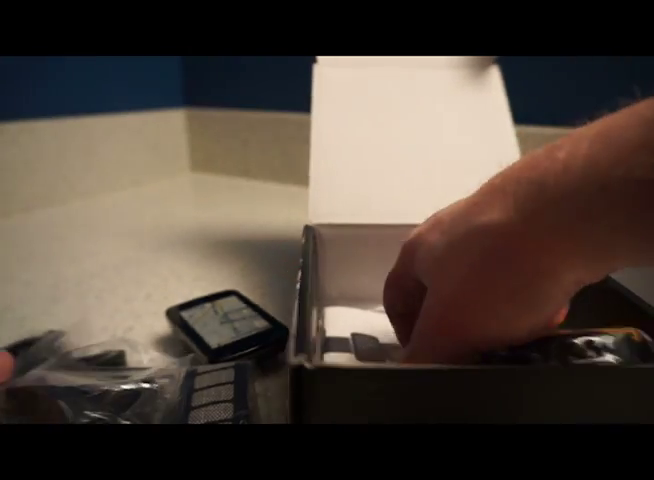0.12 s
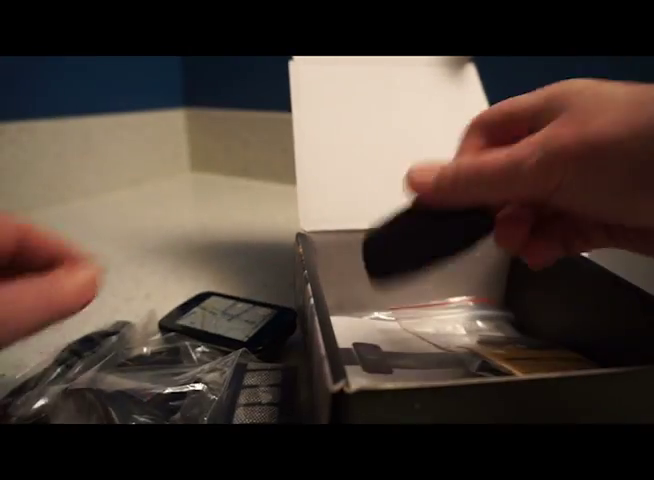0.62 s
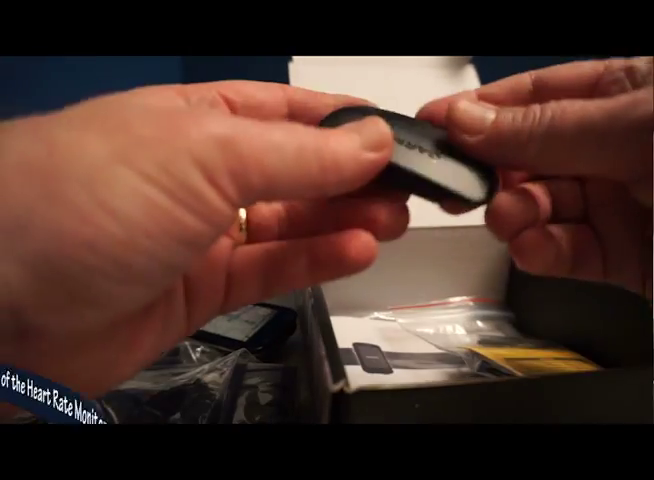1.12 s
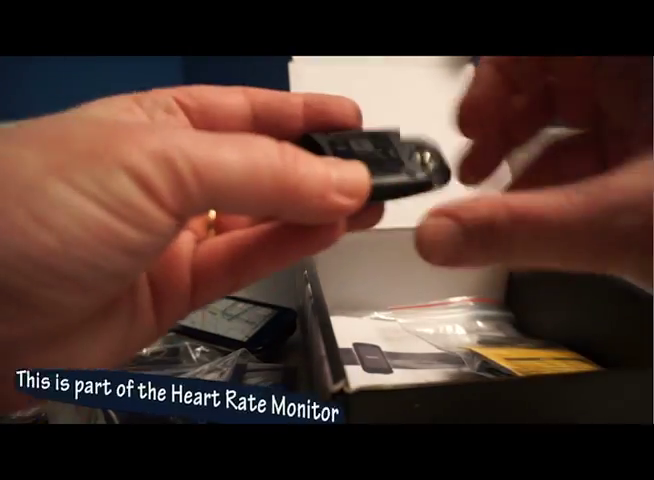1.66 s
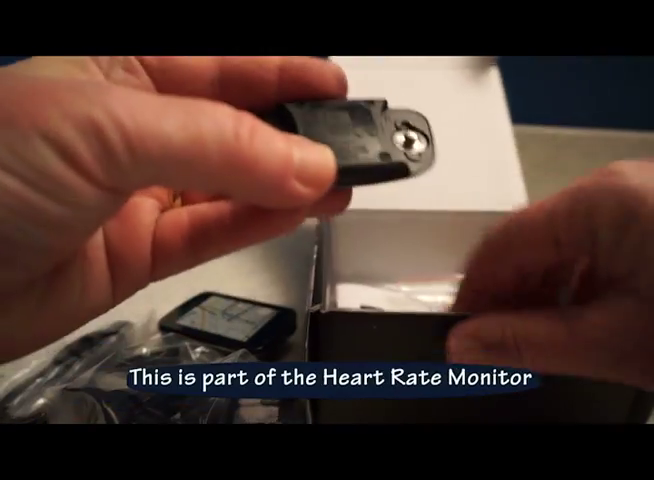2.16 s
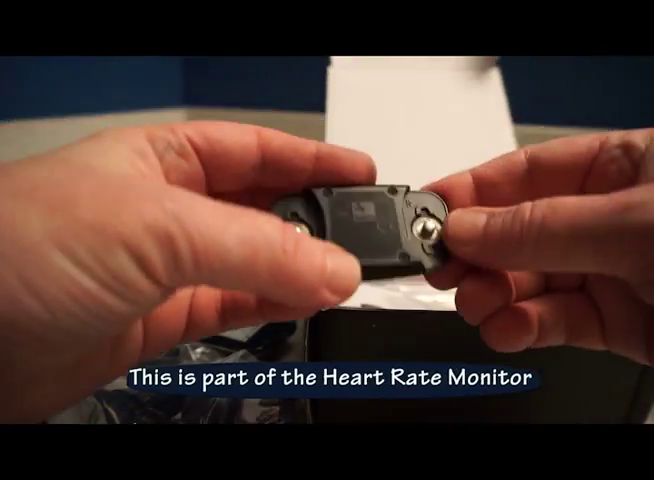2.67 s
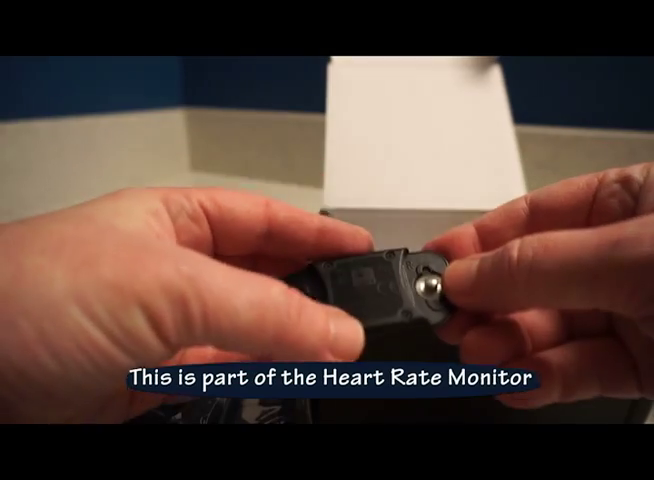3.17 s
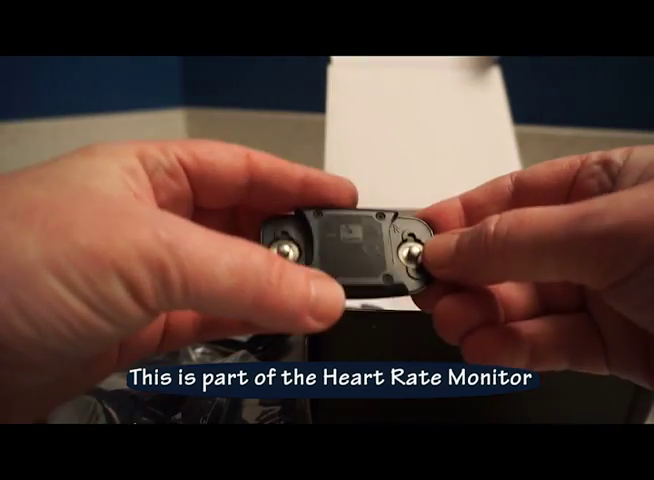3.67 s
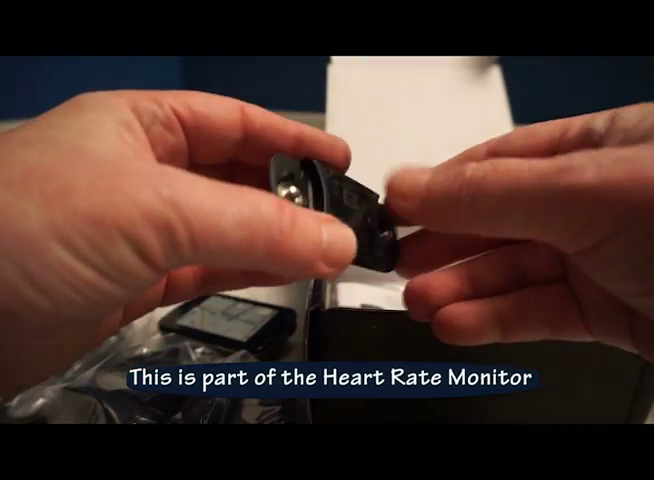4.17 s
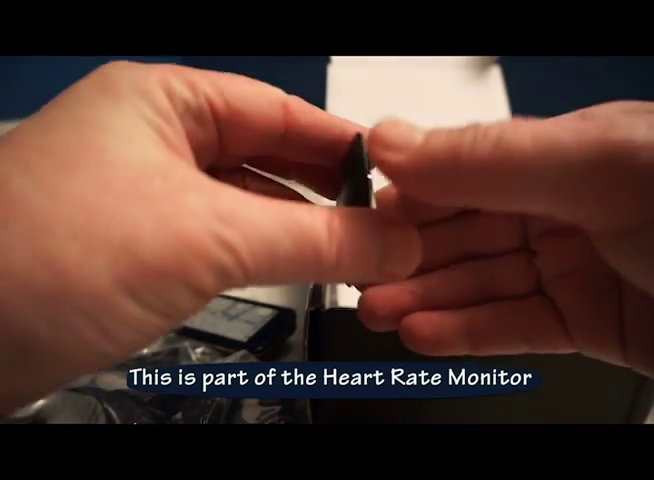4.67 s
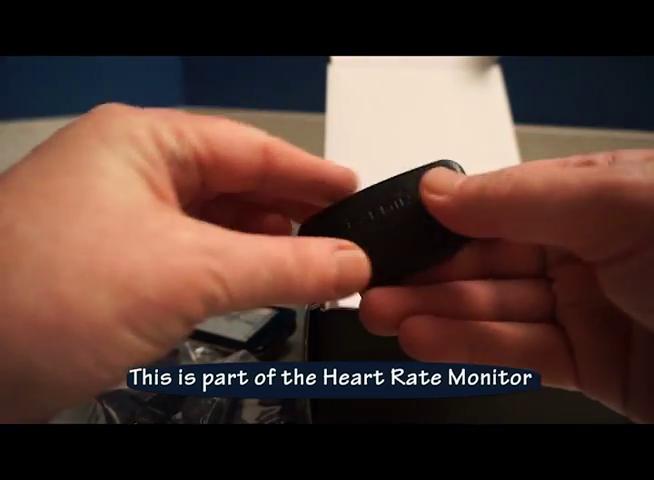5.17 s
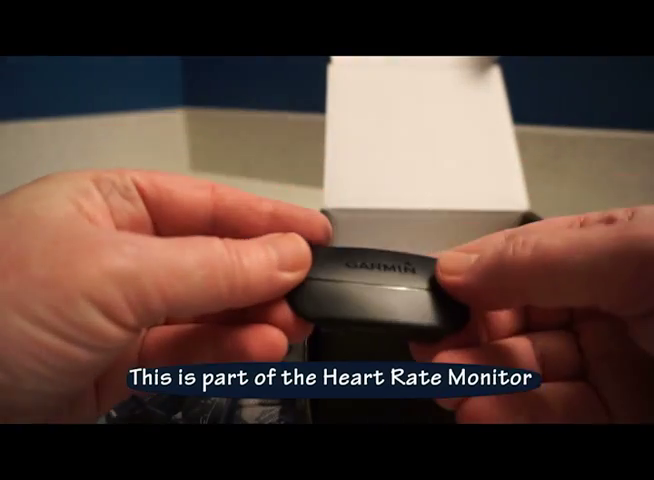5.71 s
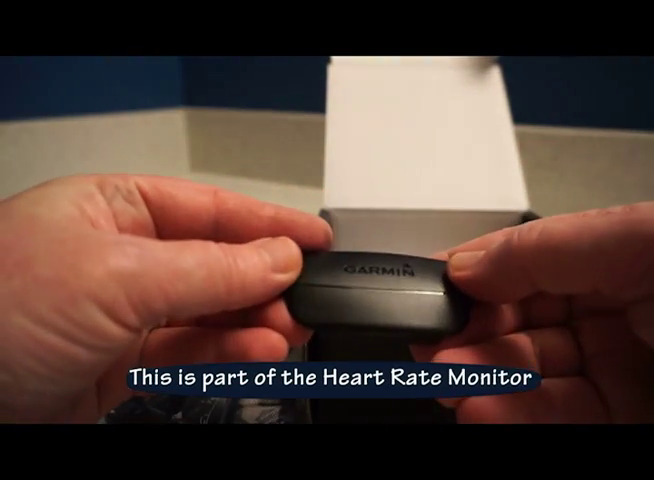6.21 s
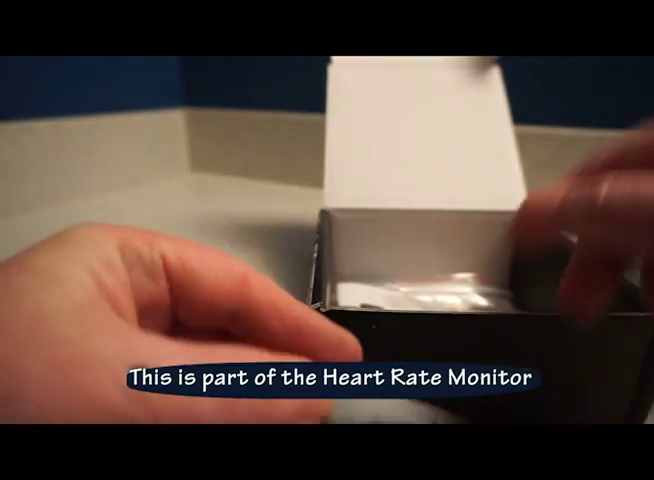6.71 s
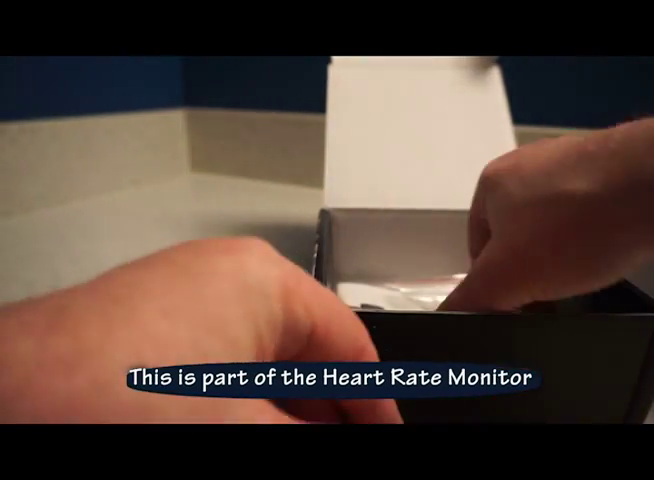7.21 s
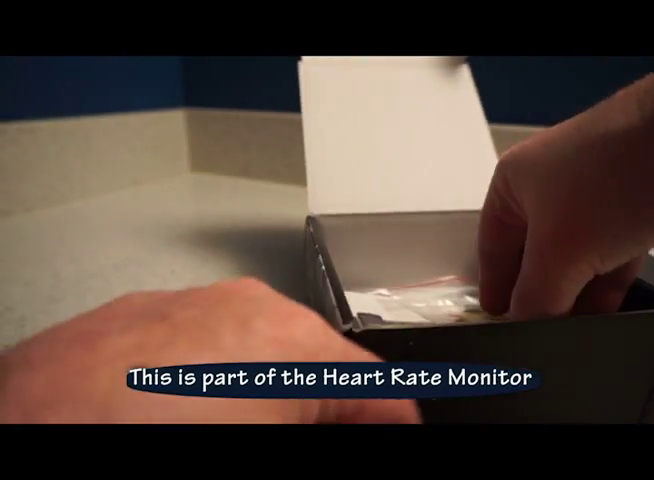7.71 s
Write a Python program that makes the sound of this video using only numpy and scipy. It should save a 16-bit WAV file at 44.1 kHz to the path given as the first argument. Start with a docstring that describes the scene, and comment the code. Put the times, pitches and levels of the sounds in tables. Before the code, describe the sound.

Close rustling and clicks from a card box, quiet skin rubs on plastic, a few box knocks, then a burst of loud crackling snaps over low rumble.

```python
"""Hands rummage in a small cardboard box, then skin rubs on a hard plastic part as it is lifted out.
Card scrapes, the box is nudged, fingers turn the part over, and the hands reach in again with loud snaps.
Noise strokes and short pushes ring card, film, plastic and skin, close to two ports in a small hard room.
Throughout lie a low rumble from outside with a drifting engine note, microphone hiss and faint electrical blips."""
import sys
import numpy as np
from scipy import signal
from scipy.io import wavfile
from scipy.ndimage import uniform_filter1d

SR = 44100
rng = np.random.default_rng(int(sys.argv[2]) if len(sys.argv) > 2 else 0)


def ratio_of_db(decibels):
    """Turn decibels (scalar or array-like) into linear amplitude factors; 0 dB maps to 1."""
    return 10 ** (np.asarray(decibels, float) / 20)


def store_pcm(level_fs):
    """Save levels as 16-bit WAV."""
    pcm = np.round(np.clip(level_fs, -1, 1) * 32767).astype(np.int16)
    wavfile.write(sys.argv[1], SR, np.atleast_2d(pcm).T)


N = 345744  # length in samples

# A place is a point on a line of bodies, numbered from the lowest; fractions fall between two bodies.
# Hand strokes in the box: peak_s, rise_s, fall_s, level_db, place (0 box, 1 card, 2 bag, 3 film)
RUMMAGE = [(0.002, .05, 0.11, -43, 2.6), (0.003, .05, 0.044, -45, 0), (0.08, 0.0091, 0.89, -36, 3.5),
           (0.2, 0.3, 0.26, -39.5, 2), (0.264, .006, 0.087, -34.5, 2), (0.313, .004, 0.12, -32, 1.5),
           (0.33, 0.09, 0.086, -27.5, 3), (0.328, 0.012, 0.03, -38, -1.5), (0.39, 0.11, 0.17, -37, 2.5),
           (0.45, 0.13, 0.12, -36.5, 1.5), (0.515, 0.011, 0.069, -23.5, -1), (0.52, 0.022, 0.21, -32, 2.5),
           (0.555, .02, 0.034, -32, 2.5), (0.572, .004, .05, -28.5, 3), (0.584, 0.018, 0.052, -23, 1.36),
           (0.61, .05, 0.076, -37, 0), (0.66, 0.055, 0.075, -43, -1.3), (0.705, .04, .06, -48, 3),
           (1.892, 0.0036, 0.15, -43, -0.5), (1.893, 0.0036, 0.083, -48.5, 2.5),
           (2.1, 0.21, 0.28, -40, 2.5), (2.17, 0.17, 0.16, -45, 3), (2.165, 0.055, .05, -47, 1),
           (2.2, 0.32, 0.19, -52.5, 0), (2.21, .15, .06, -47.5, 2), (6.68, 0.14, 0.51, -53.5, -6),
           (6.729, 0.089, 0.21, -58.5, 1.8), (6.802, 0.0023, 0.27, -51, 1.1),
           (6.846, 0.0044, 0.086, -45.5, 1.3), (6.927, .004, 0.28, -57.5, 2.2),
           (7.018, 0.0027, 0.087, -29.5, 1), (7.08, 0.072, 0.4, -46, 0.74), (7.246, 0.041, 0.084, -35, 0.6),
           (7.247, 0.066, 0.096, -41, 3), (7.33, 0.154, 0.2, -48.5, 2), (7.33, 0.045, 0.072, -49, 4),
           (7.36, 0.0034, 0.2, -42.5, 1.5), (7.39, 0.042, .08, -35.5, 1), (7.481, 0.031, 0.11, -34, .3),
           (7.535, 0.053, 0.083, -32, 2), (7.565, .1, 0.34, -33.5, 3), (7.591, .05, 0.084, -27, 2.5),
           (7.627, 0.055, .15, -26.5, 2.5), (7.677, 0.045, 0.099, -30.5, 1.5),
           (7.77, 0.0063, 0.21, -43, 2.3), (7.826, .07, .1, -39.5, 1.5)]
# Fingers on the hard part: peak_s, rise_s, fall_s, level_db, place (0 hollow, 1 lower shell, 2 upper shell, 3 rim)
FINGERS = [(1.002, .004, .08, -56.5, 1.6), (1.219, 0.062, .1, -58.5, 1.7), (1.34, 0.067, 0.055, -52.5, 3.5),
           (1.27, .1, 0.33, -63, 1.7), (1.39, .1, 0.17, -60, 5), (1.52, 0.14, 0.13, -61, 2),
           (1.44, 0.057, 0.1, -47, 2), (1.59, 0.033, .04, -59, 1), (1.679, 0.039, 0.088, -54, 2.5),
           (2.36, 0.025, .08, -60, .5), (2.361, 0.018, .04, -55, 3.5), (2.434, 0.019, 0.019, -41.5, 3),
           (4.458, 0.025, 0.074, -58, 1), (4.552, .03, 0.055, -54.5, 2), (4.699, 0.027, .04, -46.5, 2),
           (4.775, 0.038, 0.05, -54.5, 1.8), (4.845, 0.023, .03, -56, 1.8),
           (4.941, 0.028, 0.045, -49.5, 1.85), (5.03, 0.06, 0.11, -50.5, 1.7), (5.06, .15, 0.21, -49, 3.5),
           (5.09, 0.032, 0.071, -42.5, 0), (5.118, 0.055, 0.029, -36.5, 0.25), (5.33, 0.11, .08, -64, 2.5),
           (5.5, 0.53, 0.24, -66, 1.5)]
# Skin sliding without setting the part ringing: peak_s, rise_s, fall_s, level_db
SLIDES = [(1.002, .004, 0.11, -69), (1.19, 0.037, .2, -57.5), (1.32, .2, .3, -55),
          (1.439, 0.054, 0.09, -41), (1.56, .2, .3, -57.5), (1.678, 0.038, 0.1, -50.5),
          (2.36, .015, 0.07, -55), (2.44, .03, 0.092, -53.5), (4.171, 0.059, 0.065, -59.5),
          (5.09, 0.13, 0.15, -45), (5.128, 0.034, 0.023, -37.5), (5.24, 0.087, .2, -58.5),
          (5.41, 0.25, 0.24, -60), (5.523, 0.3, .19, -54.5), (5.921, .014, 0.024, -56)]
# Box walls and lid ringing in nudges, card crinkles and tails of snaps:
# peak_s, rise_s, fall_s, level_db, place (0 walls, 1 lid, 2 bag, 3 film)
BOX_RINGING = [(0.4, 0.017, 0.096, -39.5, 1.5), (0.46, 0.087, 0.017, -36, 1.5),
               (0.52, 0.016, 0.036, -31, -1), (2.58, 0.14, 0.57, -64.5, 1.5), (2.76, 0.29, 0.1, -69, 4),
               (2.978, 0.0065, 0.026, -39.5, 0), (3.035, 0.016, 0.091, -36, 0.2),
               (3.03, 0.023, 0.11, -42.5, 3), (3.031, 0.015, 0.25, -45.5, 1.5),
               (3.09, 0.065, .05, -41.5, 2.5), (3.095, 0.044, 0.038, -27.5, -0.08),
               (3.102, 0.044, 0.057, -35, 2.5), (3.162, 0.0044, 0.052, -31, -0.6),
               (3.163, .004, 0.065, -42, 2.5), (3.244, 0.0053, 0.024, -35, 0.15),
               (3.245, 0.0068, 0.053, -45, 2.5), (3.3, .05, 0.24, -63, 3.5), (3.452, .08, .13, -64, 1),
               (5.442, 0.036, 0.084, -56.5, 0.5), (6.134, .03, 0.12, -64, .1), (6.2, .06, 0.22, -59, 0.3),
               (6.29, .2, .03, -65, 0.5), (7.02, .004, 0.043, -42, 0.7), (7.484, 0.016, 0.044, -36, -1.5),
               (7.67, 0.024, 0.095, -34, 0)]
STROKE_DB = 20  # rise_s and fall_s are the times taken over this many dB
# Knocks and snaps: start_s, peak_db, place (0 box, 1 card, 2 bag, 3 film),
# focus_db (scale of the loss away from that place), pan_db (left over right)
SNAPS = [(0.0756, -24, 2.7, 9, 8), (0.1077, -15.5, 3, 10, 5), (0.118, -31, 1.5, 2.5, 6),
         (0.1807, -33, 1, 16, 4.8), (0.2438, -21, 2, 6.5, 1), (0.2603, -18.5, 3, 4.5, 3),
         (0.2873, -21, 2.5, 14, 1), (0.299, -30, 2.5, 19, -2), (0.312, -14, 2, 13, 3),
         (0.3309, -16.5, 0.94, 5.5, -0.5), (0.3457, -25, 1.5, 8, 2), (0.4539, -22, 1.4, 11.5, -1),
         (0.4965, -24, 1.6, 9, -2), (0.509, -29, .7, 1, -9), (0.5182, -12, 3.5, 3.5, 2),
         (0.57, -13, 1.5, 4, 0), (0.578, -20, 0.8, 2, 3), (0.584, -14, 1.6, 13, -3), (0.63, -25, 0, 10, -3),
         (1, -41.5, 3.5, 5, 3), (1.8892, -23, -1, 13, -2), (1.902, -26, -2, 3, 1),
         (2.3522, -29.5, 2.9, 7, 2), (2.9714, -25, 0, 32, -3), (3.023, -34.5, 4, 0, -9),
         (3.1592, -32.5, 2.5, 1.5, -2.2), (3.24, -28.5, 0.5, 6, -3), (3.442, -47.5, .6, 3, -2.9),
         (4.5532, -40.5, 1.5, 8, -4), (5.025, -26, 2, 16, 4.5), (5.121, -28, 1.9, 11, -8),
         (6.7218, -45.5, 1, 3, 3), (6.7996, -24.5, 0.9, 13, 2), (6.8433, -31.5, 1, 8, 0),
         (6.9248, -37.5, 1, 8, 3), (7.0139, -12, 1.5, 7.5, 1.5), (7.02, -31, 6, 10.5, 0),
         (7.223, -30, .5, 0, 1), (7.236, -23.5, 5, 0.5, -1), (7.2464, -20.5, 1.3, 2.5, -4),
         (7.3323, -33.5, 2, 0, 0), (7.3577, -21, 2, 7, 2), (7.4723, -18.5, 0.5, 20, -1),
         (7.4814, -16.5, -0.5, 14, 1), (7.4906, -19, 2.5, 9, -2.8), (7.5142, -7, 2.5, 6.5, -5.5),
         (7.53, -4.5, 2, 24, -5.5), (7.5348, -10.5, 2, 14, 4), (7.5632, -9.5, 2, 17, -8),
         (7.5786, -13, 3, 5.5, 0), (7.5861, -11.5, 2.5, 18, -17), (7.592, -20, 7, 4, 5),
         (7.6033, -10, 2.5, 11, -4), (7.6243, -7.5, 2, 30, -5.5), (7.6294, -18, 2.2, 12.5, 3),
         (7.6341, -12, 3, 4.5, 0), (7.6737, -12.5, 2.5, 6, -4), (7.766, -16.5, 2, 21, -0.5),
         (7.793, -31, 0.5, 11, -4.5), (7.834, -23, 0.6, 8, 0)]
SNAP_DOWN, SNAP_LEVELLING = 1.93, 0.43  # lower bodies lose more; the loss levels off with distance

# Resonances of each body: pitch_hz, half_width_hz (at -6 dB), relative level_db
BOX = [(161, 100, -11.5), (287, 160, -6), (503, 81, -8), (657, 88, 1), (820, 238, -3.5), (1005, 233, -7.5),
       (1192, 81, -8)]
CARD = [(1580, 430, 2), (2134, 370, -2.1), (2556, 460, -0.5)]
BAG = [(3330, 1080, 0), (4990, 750, 0), (5800, 920, -2), (8180, 1320, -4.5)]
FILM = [(9400, 2540, 3.4), (12260, 3200, 2.1), (14900, 1700, 3.5)]
HOLLOW = [(1590, 110, -3), (2000, 260, -1), (2450, 220, -1)]
SHELL = [(3450, 160, 0), (3850, 220, -3), (4700, 260, -4), (5100, 240, 0)]
RIM = [(7970, 260, -6), (8330, 270, -5.5)]
SKIN = [(3970, 2700, -6.5), (7150, 3000, -1.5), (10300, 2100, 5), (13100, 4600, 0), (14600, 1000, -19)]
WALLS = [(260, 135, -9), (667, 62, 0.5), (767, 70, -6), (1256, 55, -7)]
LID = [(1645, 290, -1.5), (1993, 160, 2), (2650, 620, -5.5)]

# How readily strokes crackle: bag level_db, share of crackle (0 to 1)
CRACKLE = [(-47, 0), (-41, .4), (-30, .25)]
GRAINS_PER_S, GRAIN_SPREAD_DB = 500, 5
# Left-right likeness of close sounds, from the lowest body to the highest (0 to 1)
PORTS_SAME = [0.99, 0.6, 0.58, 0.073]
# Where the hands are: time_s, pan_db (left over right)
HANDS = [(0.0, 3), (0.08, 2.5), (0.41, -0.5), (4.39, -0.5), (4.48, 5), (5.46, -2.5), (7.16, 0.5),
         (7.21, -0.5), (7.42, 0), (7.47, -2), (7.77, 0.5), (7.84, -2.5)]
# Dying away of the small hard room: pitch_hz, t60_s
ROOM = [(300, 0.097), (800, 0.43), (2000, 0.3), (5500, 0.13), (14000, 0.069)]

# Room modes lit by the rumble: pitch_hz, width_hz (full, at -6 dB), relative level_db
ROOM_MODES = [(35, 34, -18.5), (59.2, 19, -4.5), (71.5, 8.6, -6), (101, 19, -15), (117.9, 6.5, -1),
              (147.5, 19, -2.5), (224, 97, -13.5), (262.6, 33.5, -5), (320.3, 46, 0), (349.6, 8.8, -6),
              (384, 13.2, -4.5), (425.2, 6.1, -5), (483, 52, -22.5), (674, 41, -21)]
# Swell of the rumble: time_s, level_db
RUMBLE = [(0.0, -51), (0.37, -60), (0.56, -42), (0.81, -56), (1.92, -51.5), (2.49, -51), (2.95, -57),
          (3.19, -53), (4.8, -48.5), (5.26, -46), (5.61, -51), (6.53, -46), (7.03, -48.5), (7.27, -45),
          (7.71, -49.5)]
# Left-right likeness of the rumble: pitch_hz, likeness (-1 to 1)
RUMBLE_SAME = [(30, .998), (70, 1), (130, 0.98), (290, 0.92), (700, 0.66)]
# A far engine: time_s, pitch_hz, level_db
DRONE = [(0, 75, -73), (1.2, 76, -59), (2.3, 76.5, -61), (2.6, 72.2, -58), (5.9, 68, -85), (6.2, 71.6, -51),
         (6.5, 71.6, -48.5), (6.9, 77.4, -85), (7.1, 75, -81)]
# Colour of the microphone hiss: pitch_hz, relative level_db
HISS = [(18, -39), (30, -9), (69, -5), (193, -20), (318, -24.5), (553, -22.5), (700, -22), (1800, -29.5),
        (11600, -36), (12600, -35), (15900, -39)]
HISS_LEVEL_DB = -57
# Left-right likeness of the hiss: pitch_hz, likeness (-1 to 1)
HISS_SAME = [(300, 0.85), (640, -0.58), (1410, -0.33), (3100, -0.31), (6820, -0.28), (15000, 0.26)]
# Electrical tones: pitch_hz, peak level_db
BLIPS = [(12920, -63), (9800, -71)]
BLIP_START_S, BLIP_LENGTH_S, BLIPS_PER_S = 0.033, 0.008, 23.976


def evened(x):
    """Scales to rms 1."""
    return x / np.sqrt(np.mean(x ** 2) + 1e-20)


def read(points, hz):
    """Reads a curve on a log-frequency axis."""
    f, value = np.transpose(points)
    return np.interp(np.log(hz + 1), np.log(f + 1), value)


def ring(modes, size=2048):
    """Impulse response of a body: each mode swells and dies, so its skirts are steep."""
    t = np.arange(size) / SR
    response = np.zeros(size)
    for k, (hz, width, db) in enumerate(modes):
        swell = width ** 2 * t * np.exp(-2 * np.pi * width * t)
        response += (-1) ** k * ratio_of_db(db) * swell * np.sin(2 * np.pi * hz * t)
    return response


def ported(noise, same):
    """Mixes two unrelated noises into a left and right of given likeness."""
    return np.array([noise[0], same * noise[0] + np.sqrt(1 - same ** 2) * noise[1]])


def loss_db(place, count, below_db, above_db, levelling):
    """Bodies away from the place of contact get less; the loss levels off with distance."""
    away = np.arange(count) - np.asarray(place)[..., None]
    return np.where(away < 0, below_db, above_db) * away ** 2 / (1 + levelling * away ** 2)


def strokes(table, count, below_db, above_db, levelling, damping):
    """Level in dB of every body over time: strokes swell and fade, higher bodies fade sooner if damping > 1."""
    t = np.arange(0, N + 32, 32) / SR
    peak_s, rise_s, fall_s, level_db, place = np.transpose(table)
    lost = loss_db(place, count, below_db, above_db, levelling)
    late = t - peak_s[:, None]
    before = np.maximum(-late, 0) / rise_s[:, None]
    after = np.maximum(late, 0) / fall_s[:, None]
    levels = []
    for k in range(count):
        peak_db = (level_db - lost[:, k])[:, None]
        each_db = peak_db - STROKE_DB * (before + after * damping ** k)
        power = ratio_of_db(2 * each_db).sum(0)
        levels.append(np.interp(np.arange(N) / SR, t, 10 * np.log10(power + 1e-12)))
    return levels


def rubbing(levels_db, bodies, drive):
    """A noisy stroke passes each body at its own strength, panned to where the hands are."""
    sames = np.interp(np.linspace(0, 3, len(bodies)), range(4), PORTS_SAME)
    sound = np.zeros((2, N))
    for db, body, same in zip(levels_db, bodies, sames):
        stroke = drive * ported(rng.standard_normal((2, N)), same)
        rung = signal.oaconvolve(stroke, ring(body)[None], axes=1)[:, :N]
        sound += ratio_of_db(db) * evened(rung)
    pan_db = np.interp(np.arange(N) / SR, *np.transpose(HANDS))
    return sound * ratio_of_db(np.outer([.5, -.5], pan_db))


def patchy(sound, patchy_db, size, frames):
    """Random patches of colour: the tone of the rubbing varies from moment to moment."""
    z = signal.stft(sound, SR, nperseg=size, noverlap=size * 3 // 4)[2]
    patches = rng.standard_normal(z.shape[:0:-1]).T  # both channels share the patches
    patches = uniform_filter1d(patches, size=5, axis=0)
    patches = evened(uniform_filter1d(patches, size=frames, axis=1))
    return signal.istft(z * ratio_of_db(patchy_db * patches), nperseg=size, noverlap=size * 3 // 4)[1][:, :N]


def rummage(patchy_db=2.0):
    """Light strokes hiss smoothly; firm ones break into crackle."""
    levels_db = strokes(RUMMAGE, count=4, below_db=9.5, above_db=9, levelling=0.44, damping=1.145)
    crackle = np.interp(levels_db[2], *np.transpose(CRACKLE))
    grain_peaks = ratio_of_db(GRAIN_SPREAD_DB * np.minimum(rng.exponential(1, N), 3))
    grains = grain_peaks * (rng.random(N) < GRAINS_PER_S / SR)
    grains = signal.lfilter([1], [1, -.93], grains)  # each grain decays with a time constant under a millisecond
    drive = np.sqrt(1 - crackle + crackle * evened(grains) ** 2)
    sound = rubbing(levels_db, (BOX, CARD, BAG, FILM), drive)
    return patchy(sound, patchy_db, size=128, frames=10)


def fingers(flutter_db=1.5, skin_db=-6):
    """Skin slides over the part and sets the piece under it singing in narrow bands."""
    part_db = strokes(FINGERS, count=4, below_db=13, above_db=20, levelling=.55, damping=1.02)
    slide_rows = [(*row, 0) for row in SLIDES]  # a single body, so every place is 0
    slide_db, = strokes(slide_rows, count=1, below_db=0, above_db=0, levelling=0, damping=1)
    # skin is heard in every slide, and also skin_db against the strongest piece of the part
    skin = np.hypot(ratio_of_db(slide_db), ratio_of_db(np.max(part_db, axis=0) + skin_db))
    flutter = ratio_of_db(flutter_db * evened(uniform_filter1d(rng.standard_normal(N), size=600)))
    bodies = (HOLLOW, SHELL[:2], SHELL[2:], RIM, SKIN)
    sound = rubbing([*part_db, 20 * np.log10(skin)], bodies, flutter)
    return patchy(sound, patchy_db=2, size=256, frames=16)


def box_ringing(judder_db=1.5):
    """Box walls and lid ringing in narrow bands: nudges, card crinkles and tails of snaps, with a random judder."""
    levels_db = strokes(BOX_RINGING, count=4, below_db=5.5, above_db=23.5, levelling=0.62, damping=1.02)
    judder = ratio_of_db(judder_db * evened(uniform_filter1d(rng.standard_normal(N), size=200)))
    sound = rubbing(levels_db, (WALLS, LID, BAG, FILM), judder)
    return patchy(sound, patchy_db=2.5, size=256, frames=12)


def snaps(lengths_s=(.001, .0006, .0005, .0005)):
    """Each contact is a short noisy push into all four bodies; lower bodies take a longer push."""
    out = np.zeros((2, N + 4096))
    t = np.arange(600) / SR
    pushes = rng.standard_normal((len(SNAPS), 4, 2, 600))
    bodies = [ring(body)[None] for body in (BOX, CARD, BAG, FILM)]
    for (start_s, peak_db, place, focus_db, pan_db), push in zip(SNAPS, pushes):
        peaks_db = peak_db - loss_db(place, len(bodies), SNAP_DOWN * focus_db, focus_db, SNAP_LEVELLING)
        at = round(start_s * SR)
        for db, body, noise, length, same in zip(peaks_db, bodies, push, lengths_s, PORTS_SAME):
            hit = ported(noise, same) * t * np.exp(-t / length)
            hit = signal.fftconvolve(hit, body, axes=1)
            hit /= abs(hit).max(axis=1, keepdims=True)
            hit *= ratio_of_db([[db + pan_db / 2], [db - pan_db / 2]])
            out[:, at:at + hit.shape[1]] += hit
    return out[:, :N]


def room(x, wet_db=-9, lag_s=.00004):
    """The left port hears a little later; a sparse tail of reflections dies by band."""
    taps = np.zeros((2, SR // 2))
    grid = np.arange(100, SR // 2 - 20, 20)
    at = grid + rng.integers(0, 20, (2, len(grid)))  # one reflection in every 20 samples
    np.put_along_axis(taps, at, rng.choice([-1., 1.], at.shape), 1)
    hz, t, z = signal.stft(taps, SR, nperseg=256)
    z[1] += (z[0] - z[1]) / (1 + (hz[:, None] / 900) ** 2)  # close ports hear the same bass
    decay = ratio_of_db(-60 * t / read(ROOM, hz)[:, None])
    tail = signal.istft(z * decay, SR, nperseg=256)[1]
    tail *= ratio_of_db(wet_db) / np.linalg.norm(tail[0])
    # direct sound, 16 samples in so that the sinc has room on both sides
    tail += np.sinc(np.arange(tail.shape[1]) - 16 - np.array([[lag_s * SR], [0]]))
    return signal.fftconvolve(x, tail, axes=1)[:, 16:N + 16]


def noise_pair(gain, same, size):
    """Two channels of steady noise with a given spectrum and likeness."""
    a, b, c, d = rng.standard_normal((N // (size // 4) + 5, size // 2 + 1, 4)).T
    same = np.clip(same, -1, 1)[:, None]
    left = a + 1j * b
    right = same * left + np.sqrt(1 - same ** 2) * (c + 1j * d)
    z = np.array([left, right]) * gain[:, None]
    return evened(signal.istft(z, nperseg=size, noverlap=size * 3 // 4)[1][:, :N])


def rumble():
    """Noise from outside fills the low modes of the room; one engine note drifts under it."""
    hz, t = np.fft.rfftfreq(8192, 1 / SR), np.arange(N) / SR
    power = sum(ratio_of_db(2 * db) / (1 + (2 * (hz - f) / width) ** 2) ** 2 for f, width, db in ROOM_MODES)
    wash = noise_pair(np.sqrt(power), read(RUMBLE_SAME, hz), size=8192)
    wash *= ratio_of_db(np.interp(t, *np.transpose(RUMBLE)))
    time_s, note_hz, note_db = np.transpose(DRONE)
    phase = 2 * np.pi * np.cumsum(np.interp(t, time_s, note_hz)) / SR
    note = np.sqrt(2) * np.sin(phase)  # rms 1
    return wash + note * ratio_of_db(np.interp(t, time_s, note_db))


def hiss():
    """Self-noise of the microphone: steady coloured noise whose bass rise is capped."""
    hz = np.fft.rfftfreq(1024, 1 / SR)
    cap_db = read(HISS, 715.0) + 8.6
    gain = ratio_of_db(np.minimum(read(HISS, hz), cap_db))
    return ratio_of_db(HISS_LEVEL_DB) * noise_pair(gain, read(HISS_SAME, hz), size=1024)


def blips():
    """Electronics leak two high tones in brief, regular half-sine pulses."""
    t = np.arange(N) / SR
    since_s = ((t - BLIP_START_S) * BLIPS_PER_S % 1) / BLIPS_PER_S
    gate = np.sin(np.pi * np.minimum(since_s / BLIP_LENGTH_S, 1))
    return gate * sum(ratio_of_db(db) * np.sin(2 * np.pi * hz * t) for hz, db in BLIPS)


def scene():
    """Handling sounds in the room over the rumble; small objects radiate no deep bass."""
    close = rummage() + fingers() + box_ringing() + snaps()
    close = signal.lfilter(*signal.butter(2, 90, "high", fs=SR), close)
    return room(close) + rumble()


def band_limit(x):
    """A steep low-pass at the top of the band."""
    return signal.sosfilt(signal.butter(12, 16990, fs=SR, output="sos"), x)


def record(dry):
    """The microphone adds hiss, the electronics add blips, and a low-pass cuts the top."""
    mix = dry + hiss() + blips()
    low_pass = signal.firwin(301, 16000, window=("kaiser", 5), fs=SR)
    mix = signal.oaconvolve(mix, low_pass[None], "same")
    return band_limit(mix)


dry = scene()
out = record(dry)
store_pcm(out)
```